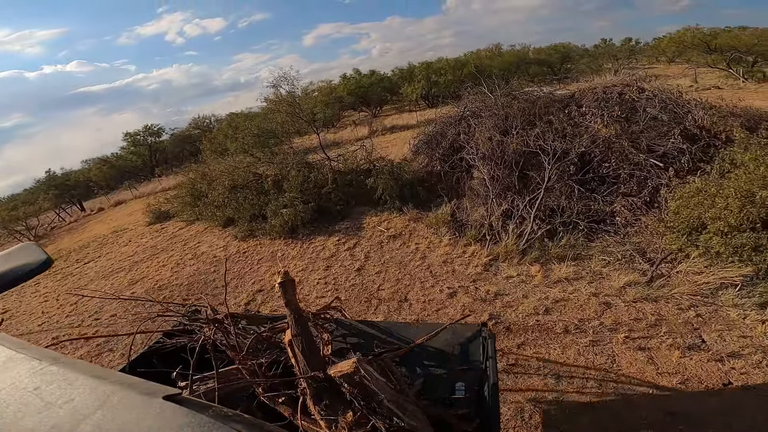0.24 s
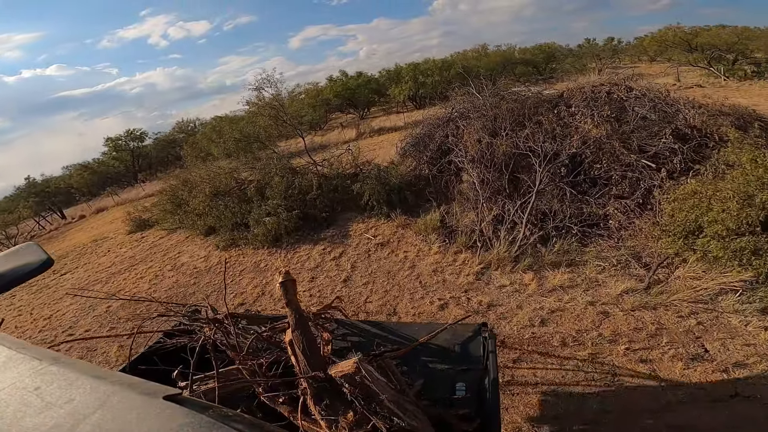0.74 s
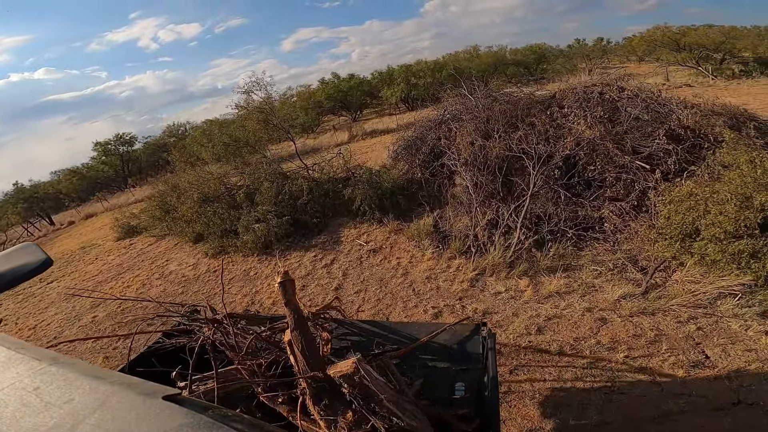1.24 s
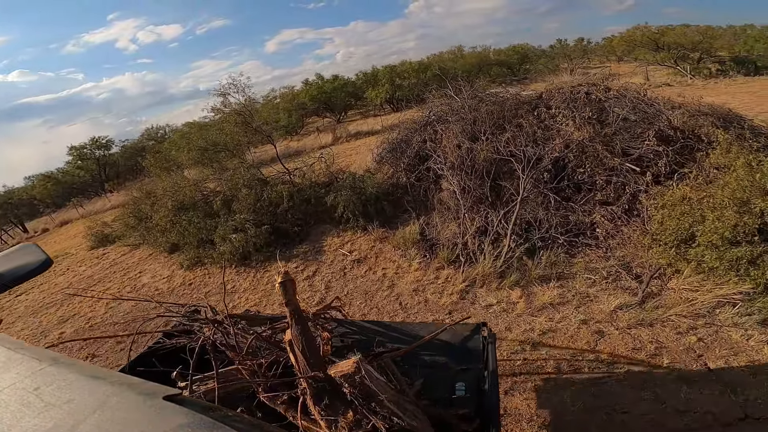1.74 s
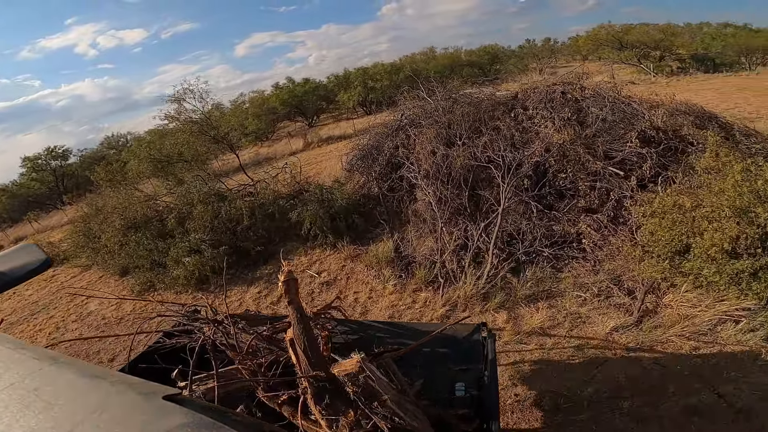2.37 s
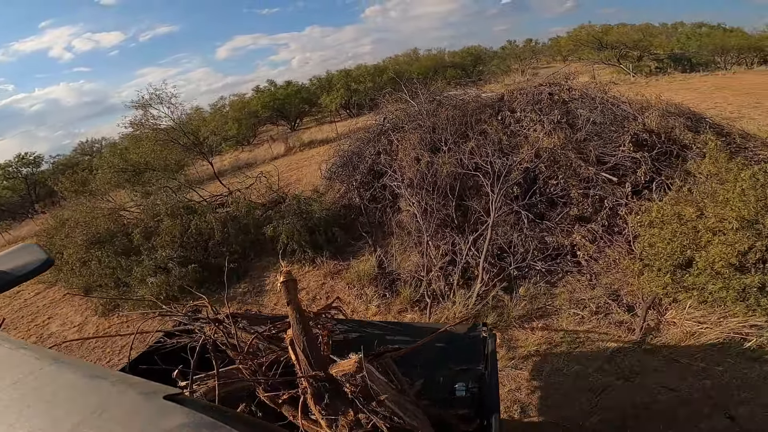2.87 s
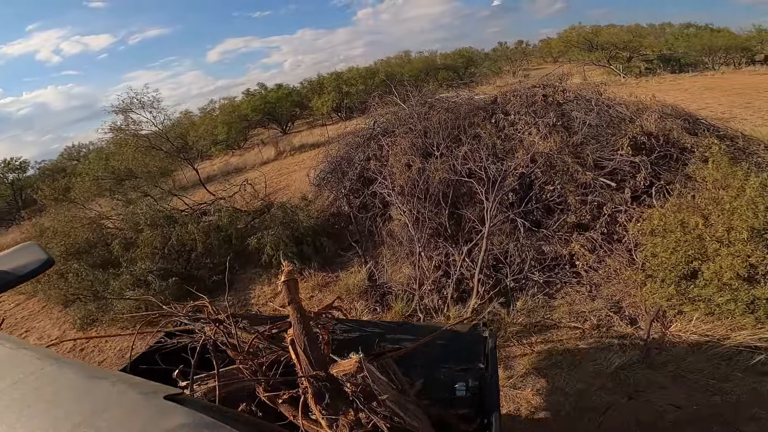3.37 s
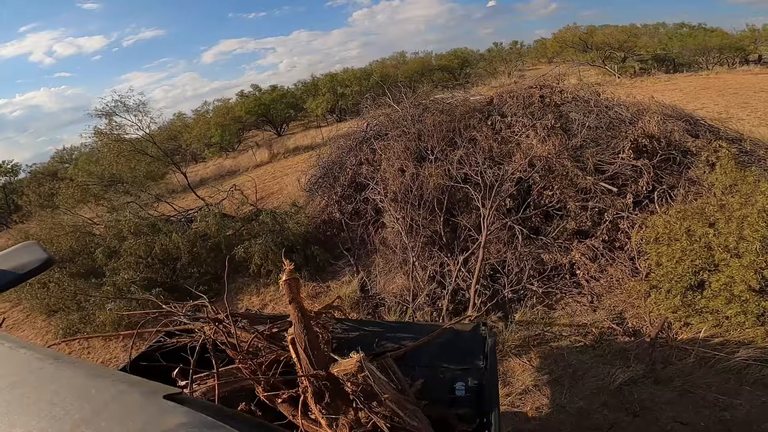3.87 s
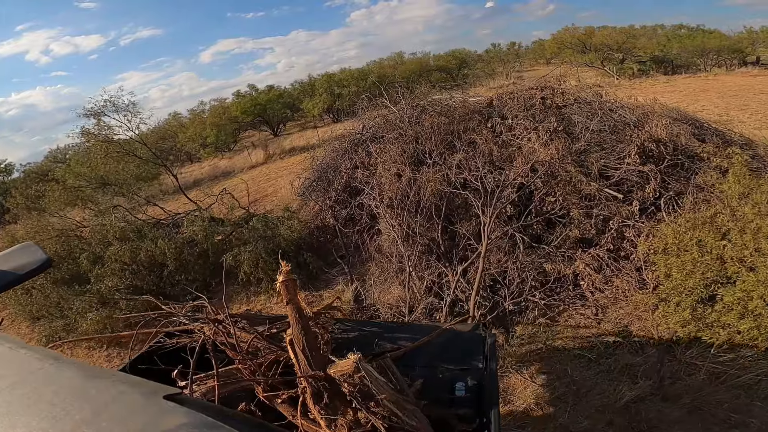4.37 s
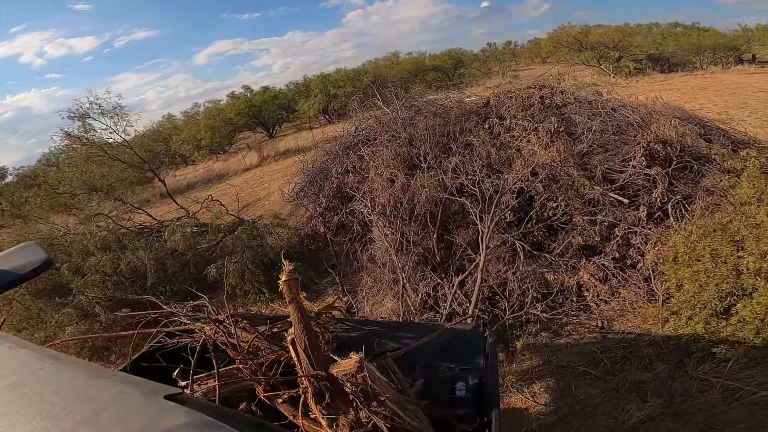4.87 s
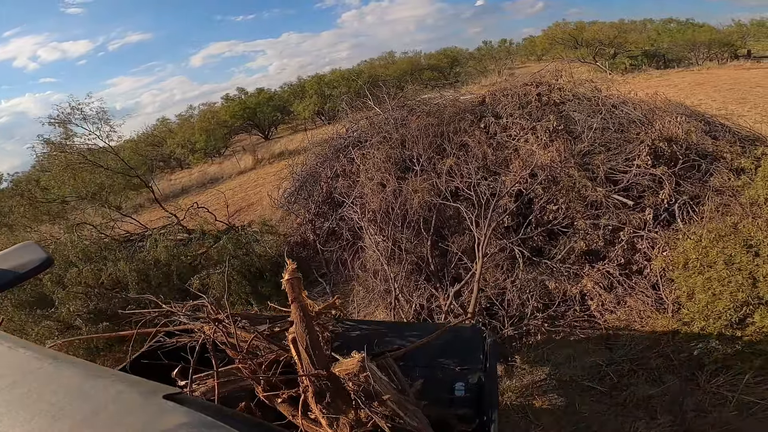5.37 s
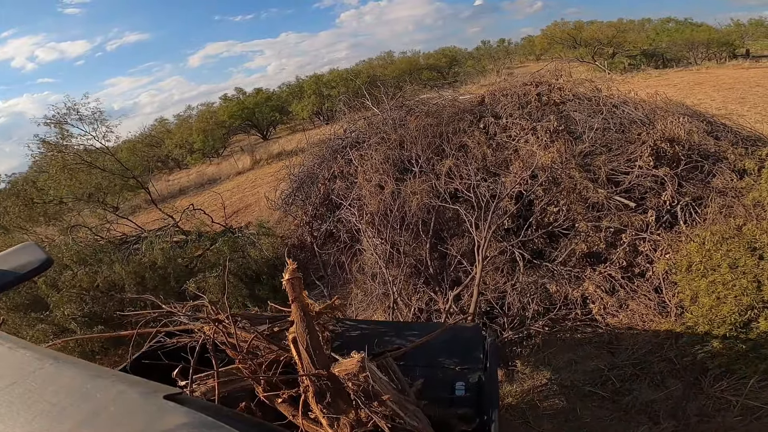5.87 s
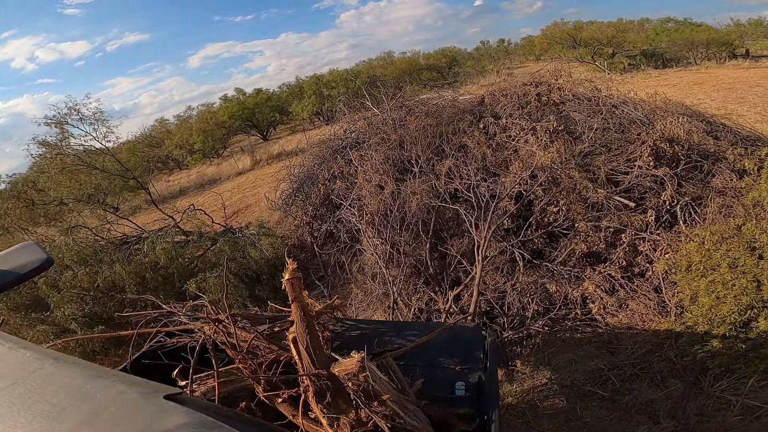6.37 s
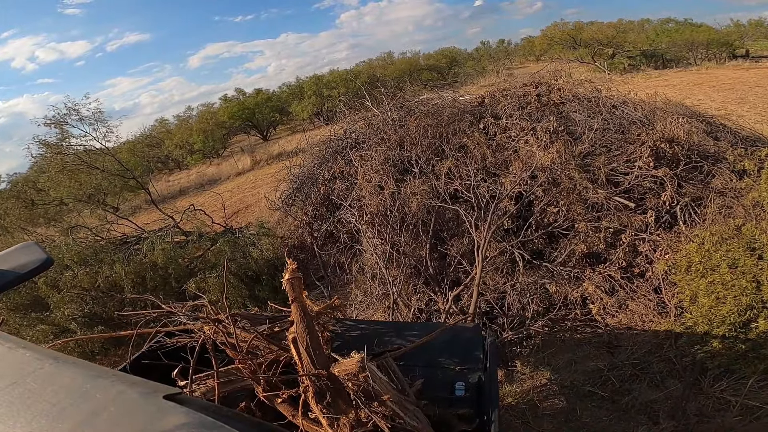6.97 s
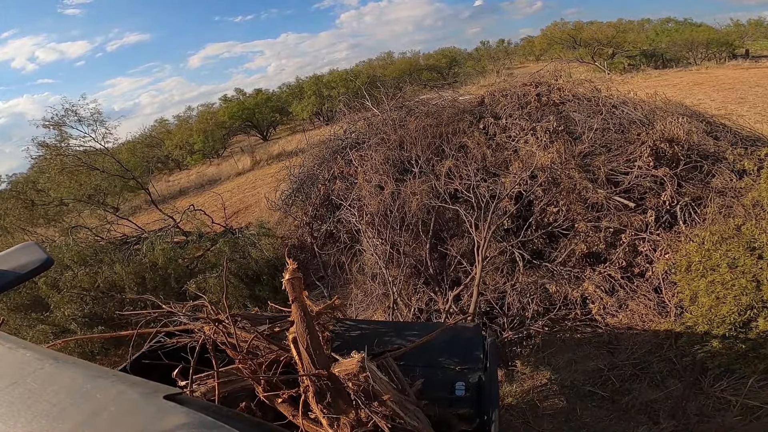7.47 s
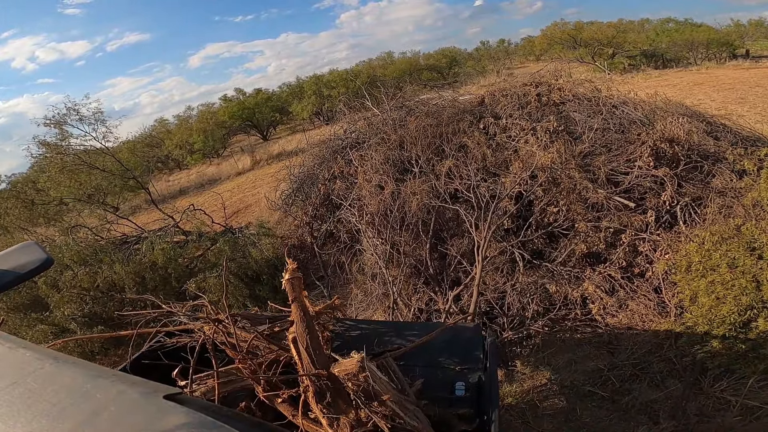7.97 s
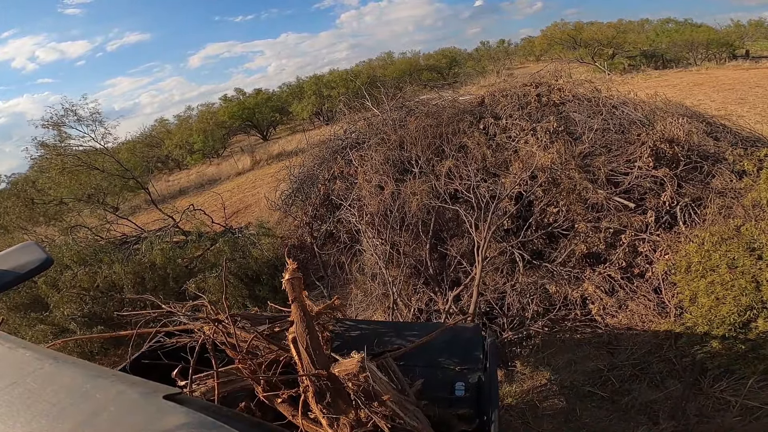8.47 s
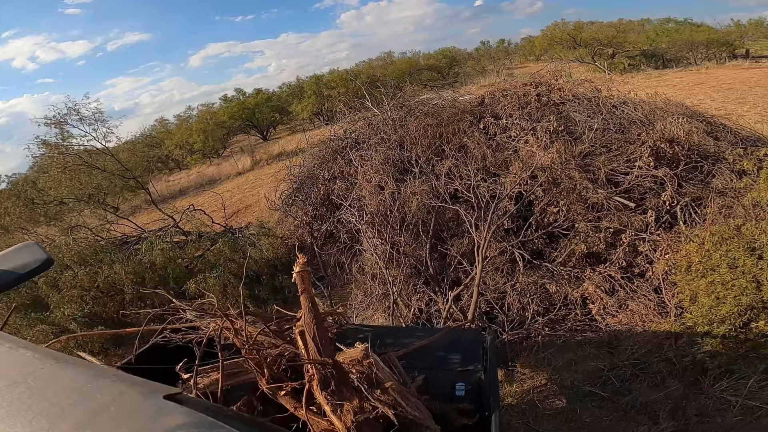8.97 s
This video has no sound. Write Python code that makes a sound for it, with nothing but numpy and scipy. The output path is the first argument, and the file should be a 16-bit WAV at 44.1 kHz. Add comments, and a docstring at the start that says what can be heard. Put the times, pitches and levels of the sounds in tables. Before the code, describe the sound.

Heard outdoors from on top of the cab, a tractor's diesel engine runs at raised speed with a pulsing exhaust drone, light metallic clinks and low wind rumble. It slows to a crawl and the clinks thin out, then it falls to a steady, throbbing idle with a few faint scrapes of dry wood. Finally the loader bucket clunks softly and the hydraulics hum over the engine.

```python
"""Diesel tractor with a load of branches

A three-cylinder tractor creeps up to a brush pile and drops to idle, heard outdoors from the cab roof.
Periodic firing pulses drive the exhaust drone and excite the resonances of block and valve gear.
Loose metal clinks, branches scrape by stick-slip friction, and turbulent air buffets the microphone.
At the end the hydraulics take the load: the bucket rings with a soft clunk and the pump hums."""
import sys
import numpy as np
from scipy import signal
from scipy.fft import rfft, irfft, next_fast_len
from scipy.io import wavfile
from scipy.ndimage import uniform_filter1d, minimum_filter1d

SR = 44100
rng = np.random.default_rng(int(sys.argv[2]) if len(sys.argv) > 2 else 0)


def transcribe(signal):
    """Save signal, clipped to [-1, 1], as a 16-bit WAV file at the path in sys.argv[1]."""
    frames = np.atleast_2d(signal).T
    limited = np.clip(frames, -1, 1)
    pcm = np.round(limited * 32767).astype(np.int16)
    wavfile.write(sys.argv[1], SR, pcm)


N = 406602
TIME = np.arange(N) / SR
IDLE_HZ = 36.6  # throughout, `hz` is the firing rate and `firing` the running count of firings


def undb(db):
    """Decibels to amplitude ratio."""
    return 10 ** (np.asarray(db) / 20)

def unit(x):
    """Normalisation to an rms of 1."""
    return x / np.sqrt(np.mean(x ** 2))

def gain_at(spectrum, hz):
    """Gain of a (frequency_hz, gain_db) spectrum, interpolated in log frequency."""
    f, db = np.transpose(spectrum)
    return undb(np.interp(np.log(hz + 1), np.log(f), db))

def shape(x, spectrum):
    """Zero-phase filtering by multiplication of spectra."""
    size = next_fast_len(N, real=True)
    return irfft(rfft(x, size) * gain_at(spectrum, np.fft.rfftfreq(size, 1 / SR)), size)[:N]

def colour(x, spectrum):
    """Spectral shaping, normalised to an rms of 1."""
    return unit(shape(x, spectrum))

def ring(x, hz, width):
    """A damped resonator with unit gain at its centre."""
    return signal.lfilter(*signal.iirpeak(hz, hz / width, fs=SR), x)

def ring_twice(x, hz, width):
    """Two equal resonators in cascade: steeper skirts and a softer onset."""
    return ring(ring(x, hz, width), hz, width)

def noise():
    """Gaussian white noise."""
    return rng.standard_normal(N)

def drift(rate_hz):
    """Smooth random modulation with a spread near 1."""
    step = max(int(SR / rate_hz), 1)
    return 1.24 * uniform_filter1d(np.repeat(rng.standard_normal(N // step + 1), step), step)[:N]

def bumps(centres_s, half_widths_s):
    """Gaussian envelopes, one column per event."""
    return np.exp(-((TIME[:, None] - centres_s) / half_widths_s) ** 2)

def burst(start_s, db, attack_s, decay_s):
    """Impact envelope: linear attack, exponential decay."""
    since = TIME - start_s
    return undb(db) * np.clip(since / attack_s, 0, 1) * np.exp(-np.abs(since) / decay_s)

def pulses(phase):
    """Impulse train: one unit pulse per turn of the phase."""
    return np.diff(np.floor(phase), prepend=np.floor(phase[0]))

def knocks(phase, decay_turns, scatter_db, cylinder_db, bed):
    """Repeated impacts: a noise burst each turn over a steady bed, every third one accented."""
    count = np.floor(phase).astype(int)
    accent = np.cos(2 * np.pi * count / 3)
    size = undb(scatter_db * rng.standard_normal(1024)[count] + cylinder_db * accent)
    return noise() * (bed + size * np.exp(-(phase % 1) / decay_turns))


# lurches of the tractor: centre_s, half_width_s, drone_sag_db, rumble_rise_db
LURCHES = [(.12, 0.24, 1, 6), (.47, 0.098, 2.5, 7), (1.44, 0.087, 4, 10.5), (2.8, 0.097, 5, 8),
           (5.235, 0.07, 13.5, 6)]
def lurches():
    """Slow amplitude modulation: at each lurch the drone sags and the rumble swells."""
    centre, half_width, sag_db, rumble_db = np.transpose(LURCHES)
    swells = bumps(centre, half_width)
    return swells @ sag_db, swells @ rumble_db

# spectrum of the buffeting: frequency_hz, gain_db
AIR = [(8, -7), (22, -4), (40, 0), (65, 3.5), (110, -1.5), (150, -10), (230, -17.5), (500, -40),
       (1500, -66.5), (8000, -82.5)]
def air(rumble_db, level_db=-29.5):
    """Turbulence: low, fitful pressure fluctuations at the microphone, stronger at each lurch."""
    return colour(noise(), AIR) * undb(level_db + rumble_db + 2 * drift(14))

# spectrum of the cab's boom: frequency_hz, gain_db
BOOM = [(60, -22.5), (105, -0.5), (135, 5), (165, -6.5), (300, -9.5), (600, -49), (3000, -110)]
def cab_boom(rumble_db, level_db=-41):
    """Low-frequency resonance: the cab booms only while the tractor lurches."""
    return colour(noise(), BOOM) * undb(level_db) * (undb(rumble_db) - 1)

# contour of a faint sizzle: time_s, level_db
SIZZLE = [(2.3, -102), (2.8, -78), (4, -83.5), (5.12, -75.5), (5.24, -74), (5.65, -73), (5.85, -81.5),
          (9.22, -82.5)]
def sizzle():
    """Band-limited noise: a thin hiss whose one narrow resonance emerges as it grows louder."""
    db = np.interp(TIME, *np.transpose(SIZZLE))
    tone = unit(ring(noise(), hz=10650, width=130)) * undb(-6 + 2.5 * drift(35) + db - db.max())
    hiss = unit(ring(noise(), hz=13000, width=4500))
    return (tone + hiss) * undb(db + drift(40))

def whine(hz, pitch_hz=1121, idle_db=-61.5, fade_db_per_hz=.5):
    """A faint pure tone with slight frequency modulation, clearest at idle."""
    db = idle_db - fade_db_per_hz * (hz - IDLE_HZ) - .5 * drift(29)
    phase = np.cumsum(pitch_hz * (1 + .004 * drift(30))) / SR
    return np.sqrt(2) * np.sin(2 * np.pi * phase) * undb(db)

# branches shifting in the load: start_s, level_db, decay_s
TWIGS = [(2.7812, -57, .02), (4.345, -43.5, 0.036), (5.3814, -53, 0.023), (6.577, -58, .02),
         (7.0709, -55, .02), (8.39, -58, 0.042), (8.885, -45, 0.065)]
# spectrum of dry wood scraping: frequency_hz, gain_db
WOOD = [(600, -6.5), (1300, -2), (1900, 0), (2800, -4), (4200, -18), (8000, -24.5), (10000, -51.5)]
def twigs(attack_s=.0037):
    """Friction noise: short, dry scrapes of branch on branch."""
    return colour(noise(), WOOD) * sum(burst(start, db, attack_s, decay) for start, db, decay in TWIGS)

# slow drags of branch over branch: centre_s, half_width_s, level_db
DRAGS = [(5.45, 0.28, -59), (6.82, .17, -58), (7.15, .25, -61), (8.4, 0.64, -62.5)]
# modes of the branches: pitch_hz, bandwidth_hz, gain_db
BRANCH_MODES = [(1880, 160, 2), (2700, 300, -10), (3800, 600, -11.5)]
def branch_drags(slips_per_s=450, patchy_db=2.5):
    """Stick-slip friction: bark catches on bark, and dense random ticks ring the branches."""
    centre, half_width, level_db = np.transpose(DRAGS)
    swell = bumps(centre, half_width) @ undb(level_db)
    slips = noise() * (rng.random(N) < slips_per_s / SR)
    rasp = sum(undb(db) * unit(ring_twice(slips, f, width)) for f, width, db in BRANCH_MODES)
    return unit(rasp) * swell * undb(patchy_db * drift(22))

# modes of the loose metal: pitch_hz, bandwidth_hz, jolted_db, shaken_db
METAL_MODES = [(1335, 25, -1.5, 3), (1642, 11, -13.5, -6), (2028, 27, -14.5, -4), (2720, 45, -10.5, -6.5),
               (3344, 63, -13.5, -13), (3940, 54, -13.5, -12)]
def metal_tremble(hz, firing, idle_db=-62, rise_db_per_hz=.42, scatter_db=5):
    """Forced vibration: every firing nudges the loose metal and sustains its thin tones."""
    taps, tones = pulses(firing), 0
    for f, width, _, db in METAL_MODES:
        nudges = taps * np.sign(noise()) * undb(scatter_db * noise())
        tones += undb(db) * unit(ring(ring(nudges, f, width), f, width=f))
    return tones * undb(idle_db + rise_db_per_hz * (hz - IDLE_HZ))

# jolts of the rolling tractor: start_s, level_db
JOLTS = [(.004, -30.5), (0.031, -36), (0.067, -37), (0.094, -35), (0.17, -38), (.279, -39), (.331, -30),
         (0.355, -33), (0.372, -35), (.449, -34), (.491, -39), (.564, -32.5), (.589, -39), (.634, -34),
         (.655, -45), (0.75, -38), (.776, -37.5), (.799, -39), (.842, -32), (.889, -35.5), (.958, -33),
         (1.068, -34), (1.18, -33), (1.247, -41), (1.807, -34), (1.872, -38), (1.996, -30), (2.221, -39),
         (2.325, -41), (2.353, -33), (2.555, -38), (2.730, -37), (2.781, -41), (2.851, -42), (2.928, -40),
         (2.995, -40), (3.04, -43), (3.115, -43), (3.236, -46), (3.305, -42), (3.355, -46), (3.907, -47),
         (3.934, -40), (4.100, -46), (4.174, -35.5), (4.223, -42), (4.364, -44), (4.673, -38.5),
         (4.769, -47), (4.938, -42), (5.255, -39)]
def metal_clinks(attack_s=.0033, scatter_db=3, detune=.005):
    """Free vibration: each jolt rings the loose metal in a slightly different mix of damped modes."""
    out, t = np.zeros(N), TIME[:SR // 8]
    for start_s, db in JOLTS:
        start = int(start_s * SR)
        for k, (f, width, mode_db, _) in enumerate(METAL_MODES):
            strength, mistuning = rng.standard_normal(2)
            size = undb(db + mode_db + scatter_db * strength * (k > 0))
            envelope = (1 - np.exp(-t / attack_s)) * np.exp(-np.pi * width * t)
            tone = np.sin(2 * np.pi * f * (1 + detune * mistuning) * t)
            out[start:start + len(t)] += size * envelope * tone
    return out

# knocks as the tractor settles and as the bucket takes the load: start_s, level_db
CLUNKS = [(6.565, -35), (8.826, -37), (8.882, -25.5)]
# modes of the bucket: pitch_hz, bandwidth_hz, gain_db
BUCKET_MODES = [(247.3, 14, 6), (332.7, 15, 8.5), (435, 22, 4.5), (565, 37, 1), (875, 73, -3.5),
                (1350, 90, -18)]
def bucket(attack_s=.011, rattle_decay_s=.053, rattle_db=-8):
    """Impact excitation: each knock rings the heavy bucket, with a short, dull rattle of its pins."""
    ringing = 0
    for start, db in CLUNKS:
        t = np.maximum(TIME - start, 0)
        for f, width, mode_db in BUCKET_MODES:
            envelope = (1 - np.exp(-t / attack_s)) * np.exp(-np.pi * width * t)
            ringing += undb(db + mode_db) * envelope * np.sin(2 * np.pi * f * t)
    pins = sum(undb(db) * ring_twice(noise(), f, 4 * width) for f, width, db in BUCKET_MODES)
    blows = sum(burst(start, db, attack_s, rattle_decay_s) for start, db in CLUNKS)
    return ringing + undb(rattle_db) * colour(pins, THROUGH_STEEL) * blows

# partials of the hydraulic pump: harmonic_number, gain_db
PUMP_HARMONICS = [(1, -0.5), (2, -3), (3, -25), (4, -16)]
def hydraulics(firing, pitch_hz=204.8, start_s=8.76, attack_s=.03, load_s=8.87, load_rise_s=.04):
    """Pressure ripple: the pump hums, growing louder and brighter under load, and the oil sings thinly."""
    running_s = np.maximum(TIME - start_s, 0)
    envelope = np.minimum(running_s / attack_s, 1) * undb(-29.5 + 2.5 * running_s)
    phase = np.cumsum(pitch_hz * (1 + .0082 * drift(70))) / SR
    pressure = .5 + .5 * np.tanh((TIME - load_s) / load_rise_s)
    flow = 1 + .47 * np.cos(2 * np.pi * firing)  # the oil flow pulses with the engine
    hum = 0
    for k, db in PUMP_HARMONICS:
        bright = 1 if k == 1 else .19 + .92 * pressure
        throb = flow if k > 2 else 1
        hum += bright * throb * undb(db + .9 * drift(35)) * np.sqrt(2) * np.sin(2 * np.pi * k * phase)
    oil = undb(-20) * pressure * flow * colour(ring(noise(), hz=852, width=24), THROUGH_STEEL)
    return (hum + oil) * envelope

# modes of the fuel lines: pitch_hz, bandwidth_hz, gain_db
FUEL_LINE_MODES = [(5460, 32, -2.5), (6900, 30, -9), (7400, 90, -7)]
def fuel_lines(hz, firing, idle_db=-71, fade_db_per_hz=1.1):
    """Lightly damped resonance: the lines ping once per engine cycle, clearest at idle."""
    pings = knocks(firing / 3, decay_turns=.25, scatter_db=2.5, cylinder_db=0, bed=.15)
    tones = sum(undb(db) * unit(ring(pings, f, width)) for f, width, db in FUEL_LINE_MODES)
    return tones * undb(idle_db - fade_db_per_hz * (hz - IDLE_HZ))

# modes of the engine on its mounts: pitch_hz, half_bandwidth_hz, gain_db, delay_firings
MOUNT_MODES = [(253, 45, -11, -.436), (342, 34, 0, -.215), (449, 33, -5.5, 0)]
def mount_thumps(hz, firing, idle_db=-56.5, fade_db_per_hz=3, scatter_db=2):
    """Staggered modes: the engine rocks on its mounts once a cycle, in a thump of rising pitch."""
    out = 0
    for f, half_width, db, delay in MOUNT_MODES:
        slack = .04 * drift(9)
        blows = pulses((firing - delay + slack) / 3) * undb(scatter_db * noise())
        out += undb(db) * unit(ring_twice(blows, f, 2 * half_width))
    return out * undb(idle_db - fade_db_per_hz * (hz - IDLE_HZ))

# spectrum of the cooling fan: frequency_hz, gain_db
FAN = [(1200, -5), (2000, 5), (3000, 1), (4200, -0.5), (4900, -4.5), (6200, -9), (8100, -10.5),
       (9200, -23.5), (11000, -35), (14000, -44), (16000, -52)]
def cooling_fan():
    """Flow noise: a broad hiss with a slight flutter."""
    return colour(noise(), FAN) * undb(.46 * drift(60))

def clatter(firing, modes, **blow):
    """Modal excitation: each resonance is struck at every firing, at its own point of the cycle."""
    out = 0
    for f, width, db in modes:
        offset = rng.uniform(0, 3)
        out += undb(db) * ring(knocks(firing + offset, **blow), f, width)
    return unit(out)

# modes of injectors and valve gear: pitch_hz, bandwidth_hz, gain_db
VALVE_MODES = [(2677, 190, -1.5), (3347, 87, -4.5), (3807, 110, -5), (3920, 190, -9.5), (4190, 490, -10),
               (5570, 160, -13), (7160, 910, -18.5)]
def valve_rattle(firing):
    """Mechanical impact noise: uneven blows ring the injectors and valve gear."""
    return clatter(firing, VALVE_MODES, decay_turns=.65, scatter_db=3, cylinder_db=1.5, bed=.27)

# modes of block and covers: pitch_hz, bandwidth_hz, gain_db
BLOCK_MODES = [(367, 160, -4.5), (500, 82, -9), (698, 78, 2.5), (857.5, 15, 1.5), (1130, 77, -1),
               (1319, 70, -1.5), (1674, 25, -6), (1792, 82, -3.5), (2022, 40, -7)]
# transmission through heavy steel: frequency_hz, gain_db
THROUGH_STEEL = [(1500, -7.5), (3000, -2), (6000, -22), (10000, -26)]
def block_clatter(firing):
    """Structure-borne sound: combustion rings the block, and the steel dulls the high treble."""
    ringing = clatter(firing, BLOCK_MODES, decay_turns=.3, scatter_db=1, cylinder_db=2.5, bed=.25)
    return colour(ringing, THROUGH_STEEL)

# spectrum of the engine's roar: frequency_hz, gain_db
ROAR = [(100, 0.5), (180, 9), (330, 8.5), (450, 2.5), (700, -2), (1000, -4), (1400, -3.5), (2000, -15),
        (2600, -14.5), (5000, -61)]
def engine_roar(firing):
    """Amplitude-modulated noise: a broad roar that pulses with each firing."""
    return colour(knocks(firing, decay_turns=.33, scatter_db=1, cylinder_db=2.5, bed=1.1), ROAR)

def order_gain(spectrum, order, hz):
    """Gain of a partial that moves with engine speed under a fixed spectral envelope."""
    return gain_at(spectrum, order * hz[::100]).repeat(100)[:N]

# spectral envelope of the throttle's overtones: frequency_hz, level_db
GROWL = [(280, -51.5), (320, -41.5), (410, -51.5), (455, -50.5), (550, -57.5), (640, -49.5), (760, -59),
         (890, -51), (980, -61), (1080, -55.5), (1500, -64.5), (2150, -62.5), (2500, -68)]
def growl(hz, firing, start_s=1.33, attack_s=.14, decay_s=.5):
    """Sharper pulses carry more overtones: sudden throttle hardens the combustion, which then softens."""
    overtones, rough_firing = 0, firing + .0042 * drift(60)
    for k in range(6, 54):
        overtones += order_gain(GROWL, k, hz) * np.cos(2 * np.pi * (k * rough_firing + rng.uniform()))
    since = TIME - start_s
    envelope = np.clip(since / attack_s, 0, 1) * np.exp(-np.maximum(since - attack_s, 0) / decay_s)
    return np.sqrt(2) * overtones * envelope * undb(.5 * drift(18))

def pipe_lag(hz, order, spread_cycles=.3):
    """Phase dispersion in the pipe; at idle the low mids fall into step and make distinct pulses."""
    scatter = np.interp(hz, [IDLE_HZ, WORKING_HZ], [.2, 1]) if 7 <= order <= 13 else 1
    return spread_cycles * scatter * rng.standard_normal()

# spectral envelope of the lines from unequal cylinders: frequency_hz, gain_db
LOPE = [(50, -56.5), (130, -44.5), (190, -58), (255, -48), (295, -64), (350, -52), (410, -63), (470, -59),
        (560, -70.5), (680, -64), (820, -71.5), (1200, -70.5)]
def lope(hz, firing, flutter_db=4, gain_db=1.5):
    """Period tripling: one cylinder hits harder, adding lines at multiples of a third of the firing rate."""
    out = 0
    for k in range(4, 76):
        order = k / 3
        if k % 3 or order > EXHAUST_HARMONICS[-1][0]:  # between or above the exhaust harmonics
            gain = order_gain(LOPE, order, hz) * undb(flutter_db * drift(6))
            out += gain * np.cos(2 * np.pi * (order * firing + pipe_lag(hz, order)))
    return out * undb(gain_db)

# exhaust partials at three engine speeds: harmonic_number, slow_db, working_db, revved_db
EXHAUST_HARMONICS = [(1, -34, -39.5, -37.5), (3, -26.5, -32, -35.5), (4, -37.5, -46.5, -55),
                     (5, -44, -34, -39.5), (6, -50, -50, -42.5), (7, -53.5, -51, -45.5),
                     (8, -54, -41, -41.5), (9, -45, -44.5, -49.5), (10, -47.5, -73.5, -54.5),
                     (11, -63, -58.5, -50), (12, -55.5, -55, -54), (13, -54.5, -70.5, -53.5),
                     (14, -61, -64, -58), (15, -68, -55, -56), (16, -59, -61, -56), (17, -58, -58, -63),
                     (18, -66.5, -68, -61.5), (19, -65, -64.5, -59), (20, -64.5, -71.5, -62)]
SLOW_HZ, WORKING_HZ, REVVED_HZ = 37, 41.8, 44.2
def exhaust(hz, firing, drone_db, drone_lag_cycles=.2):
    """Harmonic series of the firing pulses; the second sits on the pipe resonance and makes the drone."""
    out = 0
    for k, *levels in EXHAUST_HARMONICS:
        db = np.interp(hz, [SLOW_HZ, WORKING_HZ, REVVED_HZ], levels) + .85 * drift(12)
        lag = np.clip((k - 3) / 3, 0, 1) * pipe_lag(hz, k)
        out += undb(db) * np.cos(2 * np.pi * (k * firing - lag))
    drone = np.cos(2 * np.pi * (2 * firing - drone_lag_cycles))  # a resonance lags its driving force
    return np.sqrt(2) * (out + undb(drone_db + .26 * drift(25)) * drone)

# band in which the strongest cylinder thumps: frequency_hz, gain_db
CHUG_BAND = [(190, -33), (270, -19), (480, -11), (650, -27), (900, -38)]
def chug(low, hz, firing, idle_depth=.66):
    """Cyclic modulation: the low mids swell every third firing, most at idle where the flywheel is slow."""
    cycle = np.cos(2 * np.pi * firing / 3 + .15 * drift(8))
    depth = idle_depth * (1 + .2 * drift(5)) * (IDLE_HZ / hz) ** 9
    return depth * cycle * shape(low, CHUG_BAND)

# surges of engine effort: start_s, hold_s, release_s, clatter_rise_db, rattle_rise_db
SURGES = [(-.15, .15, 1.56, 6.5, 5.5), (1.309, 0.6, 1.2, 3, 4), (3.599, 0.42, 0.78, 2.5, 3),
          (5.145, 0.026, 0.53, 1.5, 3), (6.478, 0.23, 0.96, 3.5, 3.5)]
def effort(hz, attack_s=.056):
    """Engine noise grows with speed and load: the levels of clatter and rattle, in dB."""
    clatter_db = -48.5 + .3 * (hz - IDLE_HZ)
    rattle_db = -56 + .1543 * (hz - IDLE_HZ)
    for start, hold, release, clatter_rise_db, rattle_rise_db in SURGES:
        surge = np.interp(TIME, start + np.cumsum([0, attack_s, hold, release]), [0, 1, 1, 0])
        clatter_db += clatter_rise_db * surge
        rattle_db += rattle_rise_db * surge
    return clatter_db, rattle_db

def engine(hz, firing, sag_db):
    """Common excitation: one firing cycle times exhaust, block and valves, over the rush of the fan."""
    drone_db = -20 + .4574 * (hz - IDLE_HZ) - sag_db + 1.13 * drift(6.9)
    clatter_db, rattle_db = effort(hz)
    block, valves = block_clatter(firing), valve_rattle(firing)
    body = undb(clatter_db) * (undb(-4) * block + undb(.27) * engine_roar(firing))
    top = undb(rattle_db) * (undb(-5) * valves + undb(-1) * cooling_fan())
    lope_gain = undb(1.2 * (clatter_db - clatter_db.mean()))
    low = exhaust(hz, firing, drone_db) + lope_gain * lope(hz, firing) + body
    return low + chug(low, hz, firing) + top

# engine speed, revved, eased to a crawl, then dropped to idle: time_s, firing_rate_hz
ENGINE_SPEED = [(0, 44.16), (0.25, 42.95), (0.45, 42.36), (0.75, 43.42), (1.1, 44.31), (1.35, 44.53),
                (1.56, 45.87), (1.76, 45.5), (1.95, 46.25), (2.23, 45.2), (2.64, 44.83), (2.9, 42.2),
                (3.2, 41.4), (4.2, 42.06), (4.95, 42.2), (5.1, 42.17), (5.32, 36.75), (9.22, 36.91)]
def scene():
    """Superposition: all sources add at one microphone in the open air."""
    hz = np.interp(TIME, *np.transpose(ENGINE_SPEED))
    firing = np.cumsum(hz * (1 + .0015 * drift(14))) / SR
    sag_db, rumble_db = lurches()
    tractor = engine(hz, firing, sag_db) + mount_thumps(hz, firing) + metal_tremble(hz, firing)
    tractor += whine(hz) + cab_boom(rumble_db) + growl(hz, firing) + fuel_lines(hz, firing)
    loader = hydraulics(firing) + bucket() + metal_clinks() + twigs() + branch_drags()
    return (tractor + loader + sizzle() + air(rumble_db))[None]

# microphone response: frequency_hz, gain_db
MICROPHONE = [(7800, -0.5), (8400, -0.5), (9500, -1), (11500, -2.5), (14000, -2.5), (15500, -10)]
def record(dry, ceiling=.27, cutoff_hz=15700, fade_s=.002):
    """Peak and band limiting: the highest peaks are ducked, the treble rolls off and is cut at the top."""
    allowed = np.minimum(1, ceiling / (np.abs(dry[0]) + 1e-9))
    gain = uniform_filter1d(minimum_filter1d(allowed, size=700), size=700)
    fade = np.clip(np.minimum(TIME, TIME[::-1]) / fade_s, 0, 1)
    heard = shape(dry[0] * gain * fade, MICROPHONE)[None]
    return signal.sosfilt(signal.ellip(8, .2, 70, cutoff_hz, fs=SR, output="sos"), heard)


dry = scene()
out = record(dry)
transcribe(out)
```